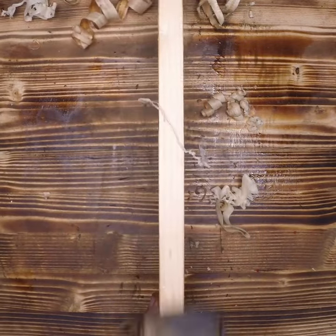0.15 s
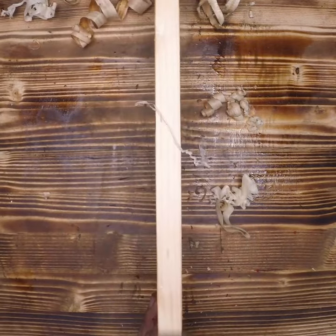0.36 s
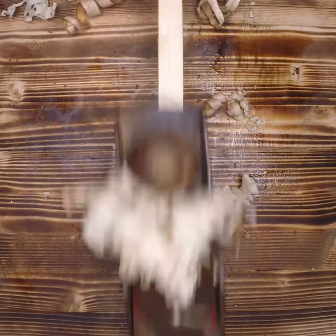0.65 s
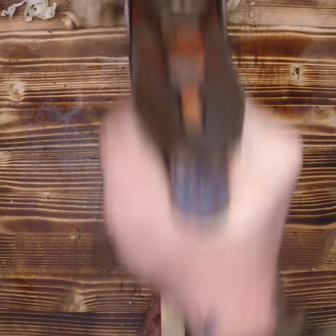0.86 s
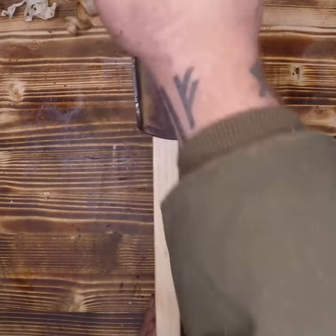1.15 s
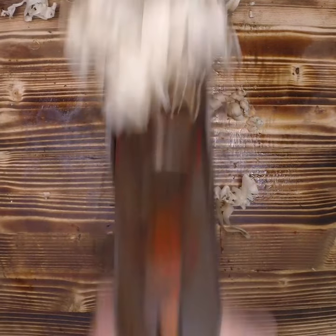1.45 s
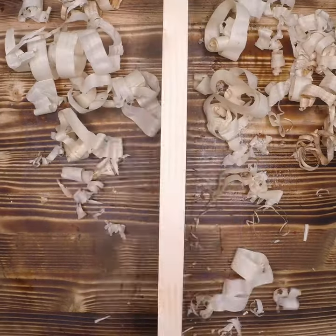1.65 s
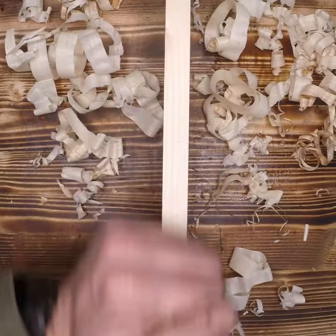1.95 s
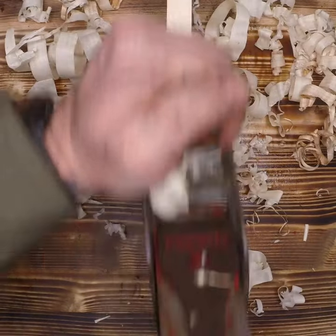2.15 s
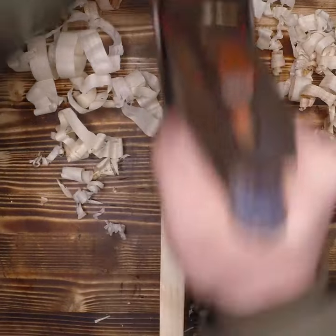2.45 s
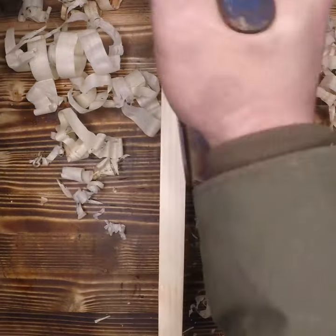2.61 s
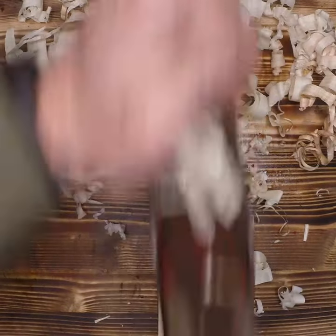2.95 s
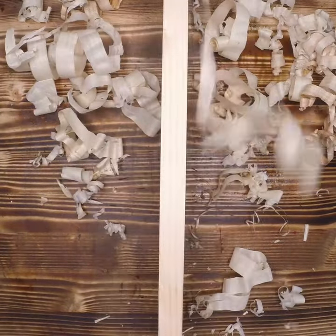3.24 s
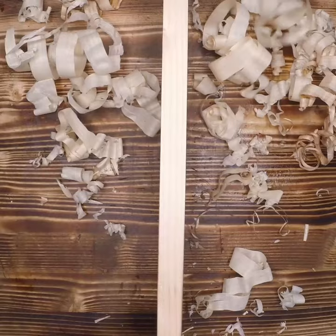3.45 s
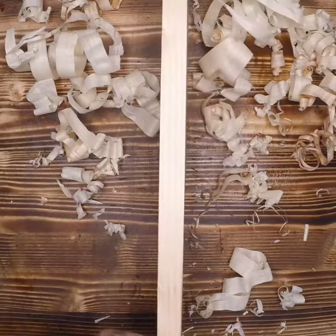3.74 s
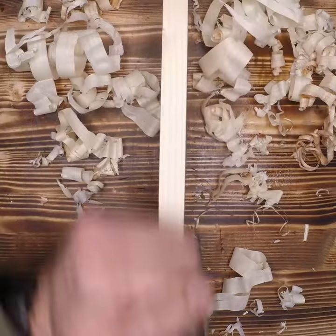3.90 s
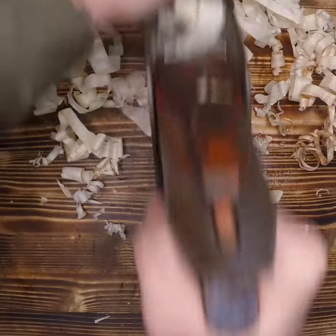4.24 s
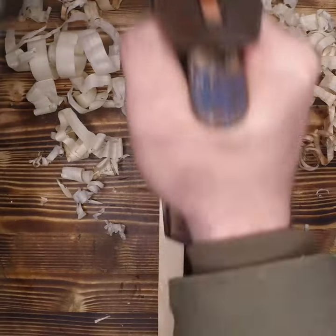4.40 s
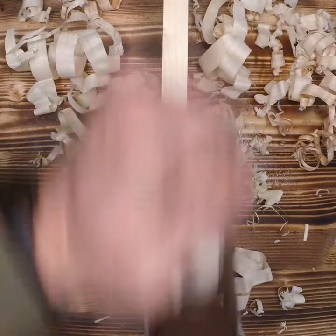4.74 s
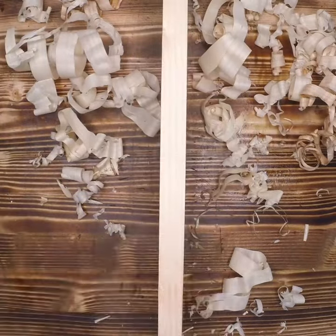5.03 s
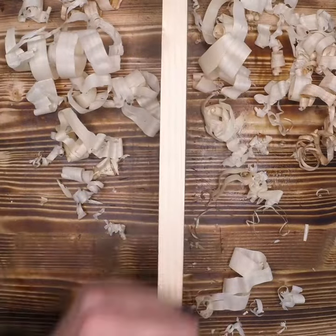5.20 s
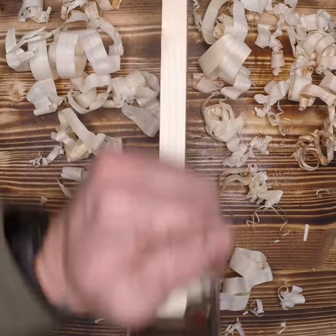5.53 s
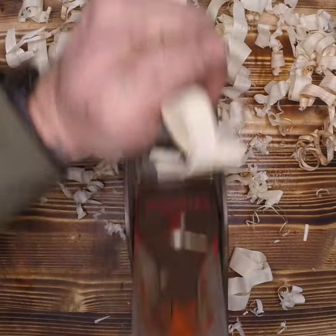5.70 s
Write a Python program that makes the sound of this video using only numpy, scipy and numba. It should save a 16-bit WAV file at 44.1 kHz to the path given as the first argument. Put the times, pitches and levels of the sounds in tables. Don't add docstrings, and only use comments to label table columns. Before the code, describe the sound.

A hand plane works a wooden board, heard close in a small workshop with a low, faint hum and short dull reverberation. Soft sliding and light bumps come first; from 0.5 s a rough, hollow rasp with tearing hiss brightens near 0.9 s, then drops into a grinding stutter with knocks at 1.1-1.2 s. A faint scrape and crisp curl snaps mark the return from 1.3 to 1.65 s. A sharp double knock lands at 1.77 s. The loudest stroke bites hard at 1.9 s and chatters on until 2.7 s. Rustling shavings and a quick drag back follow, crackling around 3.0 s and stopping with a clack at 3.25 s. After a lull, a hard double knock hits at 3.57 s. A short, bright stroke runs 3.93-4.3 s, then a quiet return ends in a knock at 4.98 s. Another landing clacks at 5.25 s, and a final rasp starts at 5.5 s, still going at the end.

```python
import sys
import numpy as np
from scipy import signal
from scipy.fft import rfft, irfft, next_fast_len
from scipy.io import wavfile
from scipy.ndimage import uniform_filter1d
from numba import njit

SR = 44100
rng = np.random.default_rng(int(sys.argv[2]) if len(sys.argv) > 2 else 0)


def bounce(signal):
    frames = np.transpose(np.atleast_2d(signal))
    limited = np.clip(frames, -1, 1)
    pcm = np.round(limited * 32767).astype(np.int16)
    wavfile.write(sys.argv[1], SR, pcm)


def makeup_ratio(level_db):
    decades = np.asarray(level_db, float) / 20
    return 10 ** decades


N = 258426

# pitch_hz, level_db, t60_s
BODY_MODES = [(315, -12.5, 0.13), (373, -31.5, 0.16), (522.4, 1, 0.1), (548, 1.5, 0.069), (608, -1, 0.14),
              (664.3, 7, 0.087), (735, 2.5, 0.15), (762.3, -1, 0.15), (850, 6, 0.086), (934, 3, 0.06),
              (1027, 3, 0.048), (1123, -3, 0.11), (1200, -1.5, 0.064), (1330, 7, 0.061), (1430, 2, 0.052),
              (1503.5, 2.5, 0.068), (1640, 2, 0.066), (1683, 2.5, 0.057), (1759, 4.5, 0.062),
              (1900, 7, 0.038), (2010, -27.5, 0.027), (2325, -0.5, 0.026), (2885, -0.5, 0.021),
              (2930, 0, 0.084)]
# start_s, peak_db, pitch_hz, t60_s
BENCH_THUMPS = [(0.06, -37, 138, 0.21), (0.09, -24.5, 149, 0.27), (0.244, -26, 85, 0.05),
                (.268, -34, 75, .08), (0.342, -25, 101, 0.14), (0.421, -27.5, 132, 0.065),
                (0.398, -22, 152, 0.036), (0.806, -20, 147, 0.23), (1.236, -31.5, 297, 0.28),
                (1.592, -25.5, 128, 0.061), (1.616, -24, 180, 0.029), (1.778, -17, 415, 0.17),
                (1.818, -23.5, 90, 0.083), (2.801, -34, 134, 0.19), (3.246, -18.5, 236, 0.17),
                (3.25, -15, 80.5, 0.15), (3.296, -25, 156.6, 0.17), (3.582, -15, 307.3, 0.21),
                (3.923, -25.5, 49.4, 0.078), (4.235, -33.5, 152.5, 0.3), (4.4, -28.5, 128, 0.049),
                (4.544, -33, 182, 0.12), (4.683, -28, 101, 0.099), (4.801, -36.5, 111, 0.22),
                (4.978, -13, 218, 0.11), (5.008, -20.5, 202, .05), (5.223, -34.5, 52, 0.36),
                (5.463, -33, 141.5, 0.17), (5.572, -26, 328, 0.19)]


def rms_one(x):
    return x / np.sqrt(np.mean(x ** 2) + 1e-20)


def evened(x, span_s):
    return x / np.sqrt(uniform_filter1d(x ** 2, size=int(span_s * SR)) + 1e-12)


def filtered(x, order, edge_hz, kind):
    return signal.sosfilt(signal.butter(order, edge_hz, kind, fs=SR, output="sos"), x)


def drift(rate_hz):
    r = np.exp(-2 * np.pi * rate_hz / SR)
    noise = rng.standard_normal(N + SR)
    return rms_one(signal.lfilter([1], [1, -2 * r, r * r], noise)[SR:])


def coloured(x, spectrum):
    hz, level_db = np.transpose(spectrum)
    size = next_fast_len(N)
    log_hz = np.log(np.arange(size // 2 + 1) * SR / size + 1e-3)
    gain = makeup_ratio(np.interp(log_hz, np.log(hz), level_db))
    return rms_one(irfft(rfft(x, size) * gain, size)[:N])


def grains(per_s, spread_db):
    sizes = makeup_ratio(spread_db * np.minimum(rng.exponential(1, N), 4))
    signs = rng.choice([-1, 1], N)
    return rms_one(sizes * signs * (rng.random(N) < per_s / SR))


def ring(x, hz, t60):
    r = makeup_ratio(-60 / (t60 * SR))
    w = 2 * np.pi * hz / SR
    return signal.lfilter([0, np.sin(w)], [1, -2 * r * np.cos(w), r * r], x + 1e-18)


@njit
def glide(x, w, r):
    y = np.zeros(len(x))
    for i in range(2, len(x)):
        drive = (1 - r[i] ** 2) / 2 * (x[i] - x[i - 2])
        y[i] = drive + 2 * r[i] * np.cos(w[i]) * y[i - 1] - r[i] ** 2 * y[i - 2]
    return y


def place(out, hit, i, peak_db):
    hit = makeup_ratio(peak_db) * hit / np.abs(hit).max()
    out[i:i + len(hit)] += hit[:N - i]


def controls(tables):
    t = np.arange(N) / SR
    out = np.zeros((len(tables[0][0]) - 1, N))
    for rows in tables:
        s, *columns = np.transpose(rows)
        i = round(s[0] * SR)
        out[:, i:] = [np.interp(t[i:], np.maximum.accumulate(s), c) for c in columns]
    return uniform_filter1d(out, size=160, axis=1)


def skid(s, hz, level_db, bite_db, fade_db_s):
    attack_s, rise_db, sag_octaves_per_s, slowest_hz = 0.012, 11.5, 10, 470
    t = np.concatenate([[0], attack_s + np.linspace(0, .4, 21)])
    after = np.maximum(t - attack_s, 0)
    ripple_hz = np.maximum(hz * 2 ** (-sag_octaves_per_s * after), slowest_hz)
    chatter_db = np.maximum(level_db - fade_db_s * after - rise_db * (t == 0), -77.5)
    bite = np.maximum(bite_db - 1.96 * fade_db_s * after, -102.5)
    return np.transpose([s + t, ripple_hz, chatter_db, bite])


def strokes():
    # start_s, ripple_hz, chatter_db, bite_db
    slide_in = [(0, 890, -51.5, -50), (.134, 1240, -48.5, -51.5), (.2, 1430, -42.5, -45.5),
                (.262, 1070, -41.5, -54.5), (.312, 610, -27, -58.5), (.39, 553, -51, -93),
                (.46, 604, -46.5, -57.5)]
    cut_1 = [(0.461, 594, -38.5, -64), (0.501, 1510, -38.5, -44.5), (.53, 1330, -25, -43.5),
             (0.6, 735, -21, -42.5), (0.655, 690, -26, -40), (0.699, 1330, -28.5, -42),
             (0.761, 1220, -29, -35), (.8, 770, -41, -38.5)]
    run_out_1 = [(.8, 775, -29.5, -39), (.845, 895, -49, -34), (.862, 1810, -32, -33.5),
                 (.935, 1890, -36, -36.5), (1.002, 1820, -29.5, -42), (1.045, 1200, -21, -38),
                 (1.097, 630, -25, -49.5), (1.128, 474, -23, -56.5), (1.205, 465, -27.5, -75),
                 (1.24, 490, -37.5, -88), (1.31, 470, -66, -101.5)]
    draw_back_1 = [(1.317, 777, -52.5, -70), (1.4, 2240, -73.5, -45), (1.524, 1880, -39.5, -43),
                   (1.548, 1920, -35.5, -50), (1.621, 727, -50, -49.5), (1.641, 770, -35.5, -51),
                   (1.658, 730, -75.5, -93.5)]
    cut_2 = [(1.886, 640, -30, -60), (1.894, 630, -16, -50), (1.916, 608, -24, -47.5),
             (1.926, 590, -9, -49), (2.049, 973, -21.5, -40), (2.128, 1380, -26, -45),
             (2.2, 850, -26, -41.5)]
    run_out_2 = [(2.2, 850, -27.5, -43.5), (2.29, 687, -15, -47), (2.42, 850, -23, -46),
                 (2.53, 900, -32, -39.5), (2.628, 948, -29, -43.5), (2.686, 827, -30, -52),
                 (2.72, 677, -36.5, -59.5), (2.752, 775, -51.5, -63)]
    draw_back_2 = [(2.759, 673, -67.5, -72.5), (3.0, 692, -40, -41.5), (3.08, 670, -37.5, -39.5),
                   (3.139, 2070, -38.5, -42), (3.202, 1550, -34.5, -47.5), (3.236, 1160, -22.5, -41),
                   (3.269, 1197, -16.5, -56.5)]
    landing_3 = [(3.917, 713, -38.5, -71.5), (3.927, 760, -19, -55), (3.941, 1230, -25, -28),
                 (3.958, 1270, -13, -35), (3.963, 1356, -23.5, -37.5)]
    cut_3 = [(3.969, 1440, -31.5, -36), (4.0, 1330, -37.5, -54), (4.026, 2010, -31, -32.5),
             (4.086, 1020, -22.5, -46.5), (4.133, 850, -23, -46), (4.203, 780, -29, -40.5),
             (4.244, 746, -43.5, -55), (4.34, 1505, -46.5, -58.5)]
    draw_back_3 = [(4.345, 1540, -59.5, -49.5), (4.386, 1970, -32, -44.5), (4.5, 743, -56.5, -63.5),
                   (4.762, 716, -52, -59), (4.779, 1920, -38.5, -54.5), (4.813, 1640, -45.5, -59),
                   (4.87, 1200, -46.5, -55), (4.955, 1530, -33.5, -50.5)]
    cut_4 = [(5.476, 412, -50.5, -83.5), (5.558, 645, -25.5, -62.5), (5.592, 876, -20.5, -46.5),
             (5.635, 1036, -25.5, -51), (5.682, 1154, -29.5, -48), (5.758, 917, -30, -42.5),
             (5.86, 947, -26.5, -50.5)]
    # start_s, ripple_hz, chatter_db, bite_db, fade_db_per_s
    skids = [
        (1.76, 724, -10, -35.5, 305),
        (3.272, 1250, -35, -51.5, 123),
        (3.498, 778, -51, -55, 286.5),
        (3.554, 598, -14.5, -37, 191.5),
        (4.971, 1246, -26.5, -45.5, 198),
        (5.16, 1900, -56, -75, 12.5),
        (5.246, 1390, -17.5, -33.5, 123.5),
    ]
    moves = [slide_in, cut_1, run_out_1, draw_back_1, cut_2, run_out_2, draw_back_2,
             landing_3, cut_3, draw_back_3, cut_4]
    moves += [skid(*row) for row in skids]
    return controls(sorted(moves, key=lambda rows: rows[0][0]))


def body(force, coupling_db):
    out = 0
    for k, (hz, level_db, t60) in enumerate(BODY_MODES):
        out = out + (-1) ** k * makeup_ratio(level_db) * ring(force * makeup_ratio(coupling_db[k]), hz, t60)
    return out


def chatter(level_db, hz, bite_db):
    bumps = grains(2500, spread_db=4.5) * makeup_ratio(1.9 * drift(57))
    w = 2 * np.pi * hz / SR
    r = np.exp(-np.pi * 0.42 * hz / SR)
    ripple = evened(glide(glide(bumps, w, r), w, r), 0.091)
    octave = evened(glide(glide(bumps, 2 * w, r), 2 * w, r), 0.32)
    rub = rms_one(filtered(grains(4000, spread_db=2.5), 2, [480, 2100], "band"))
    rub_db = 11 + 0.76 * (bite_db - level_db)
    force = ripple + makeup_ratio(-12) * octave + makeup_ratio(rub_db) * rub
    wander = [drift(7.9) for _ in range(6)]
    answer = body(force, [2.7 * wander[k % 6] for k in range(len(BODY_MODES))])
    direct = makeup_ratio(-12.5) * rms_one(force)
    return makeup_ratio(level_db) * evened(rms_one(answer) + direct, 0.028)


def blade(bite_db):
    # pitch_hz, level_db per Hz
    hiss_spectrum = [(1200, -1.5), (2000, 2.5), (2500, -5), (3200, -2), (4000, -8.5), (5000, -15.5),
                     (6300, -6), (9000, -67)]
    # pitch_hz, level_db per Hz
    shaving_spectrum = [(2500, -13.5), (5000, -8), (6300, -10), (8000, -13), (10000, -17.5), (13000, -28.5),
                        (15500, -28.5), (18000, -39)]
    # pitch_hz, width_hz, level_db
    iron_modes = [(2296, 96, 5), (2740, 62, 10), (2947, 17, 11), (3300, 280, 1.5), (3616, 62, 10),
                  (4470, 210, 5), (4620, 700, 4.5), (5710, 130, 1), (7190, 72, 20.5)]
    # start_s, end_s, extra_db
    loose_curls = [
        (1.317, 1.66, 10),
        (2.227, 2.724, 5),
        (2.856, 3.273, 8.5),
        (2.757, 2.77, 21),
        (2.873, 2.898, 4),
        (4.24, 4.275, 16),
        (4.336, 4.412, 7),
        (4.45, 4.515, 11),
        (4.773, 4.949, 7),
    ]
    tear = coloured(grains(8000, spread_db=-3.5), hiss_spectrum)
    iron = np.zeros(N)
    for hz, width, level_db in iron_modes:
        iron += makeup_ratio(level_db + 5.5 * drift(20)) * ring(tear, hz, 1.6 / width) * width / 900
    clumps = drift(4.4)
    hiss = rms_one(tear + makeup_ratio(-5.0) * iron) * makeup_ratio(bite_db + 0.32 * clumps)
    t = np.arange(N) / SR
    shavings_db = bite_db - 14
    for start, end, extra_db in loose_curls:
        shavings_db = shavings_db + extra_db * ((t > start) & (t < end))
    rustle = coloured(grains(13000, spread_db=3.5), shaving_spectrum)
    return hiss + rustle * makeup_ratio(shavings_db + 0.99 * clumps + 1.5 * drift(60))


def squeals(bite_db):
    out = np.zeros(N + SR)
    waver = drift(90)
    for when, pitch, span in rng.random((500, 3)):
        octaves = 2 * pitch ** 1.3
        t = np.arange(int(0.031 * (.5 + span) * SR)) / SR
        i, j = int(when * N), int(span * (N - SR))
        tone = np.sin(2 * np.pi * 2100 * 2 ** octaves * t)
        out[i:i + len(t)] += makeup_ratio(-5 * octaves) * np.hanning(len(t)) * waver[j:j + len(t)] * tone
    return out[:N] * makeup_ratio(bite_db - 4)


def catches():
    # start_s, peak_db, pitch_hz, length_s
    early = [(0.001, -37.5, 1950, 0.0073), (0.083, -37, 678, 0.024), (0.141, -35, 684, 0.021),
             (0.188, -30, 730, 0.0071), (.203, -32.5, 1450, 0.018), (0.213, -30, 700, 0.024),
             (.253, -27, 1120, 0.016), (0.256, -29, 517, 0.036), (2.219, -19, 1320, 0.014),
             (0.293, -24, 850, 0.017), (0.302, -24, 677, 0.02), (0.32, -31, 1082, 0.025),
             (0.714, -19, 1100, 0.015), (0.719, -30, 2830, 0.015), (0.733, -19.5, 1590, 0.0094),
             (0.856, -24.5, 1700, 0.014), (.893, -25.5, 1920, 0.031), (.9, -35, 2700, 0.038),
             (.95, -25.5, 1870, 0.008), (0.966, -24.5, 1625, 0.013), (.972, -28, 2010, 0.015),
             (0.991, -27, 1986, 0.021), (1.037, -22, 1313, 0.048), (1.082, -11, 758, 0.014),
             (1.112, -10, 540, 0.01), (1.955, -26, 1700, .03), (1.388, -39, 1940, 0.011),
             (1.415, -30.5, 1940, 0.021), (1.46, -33, 1980, 0.0088), (1.511, -30, 1550, 0.014),
             (1.55, -27, 780, 0.0067), (1.215, -24.5, 509, 0.025), (1.985, -5.5, 815, 0.0089),
             (2.003, -22.5, 1776, 0.038), (2.016, -15, 661, 0.014), (2.042, -27, 1957, 0.017),
             (2.552, -30, 1970, 0.045), (2.038, -15, 807, 0.0044), (2.236, -12, 850, 0.014),
             (2.27, -9.5, 861, 0.013), (2.286, -15, 695, 0.0058), (2.426, -13, 840, 0.0092),
             (2.468, -20, 850, 0.0079), (2.446, -23.5, 1290, 0.031), (2.612, -21, 910, 0.017),
             (2.623, -22, 950, 0.027), (2.071, -20, 1007, 0.034), (2.807, -28.5, 830, 0.0036)]
    # start_s, peak_db, pitch_hz, length_s
    late = [(3.151, -31, 2020, 0.025), (3.172, -31, 1930, 0.028), (3.195, -23, 1593, 0.021),
            (3.211, -21, 1258, .015), (3.229, -15, 1442, 0.011), (3.941, -26, 2540, 0.019),
            (3.268, -22, 1172, 0.04), (3.567, -25, 1480, 0.016), (3.575, -22, 1705, 0.013),
            (3.577, -22, 1340, 0.014), (3.558, -15, 687, 0.0072), (0.542, -21.5, 1042, 0.022),
            (.55, -23, 1514, 0.023), (0.635, -13, 687, 0.017), (1.766, -7, 640, 0.008),
            (2.407, -16, 853, 0.012), (3.599, -20, 553.6, 0.036), (3.927, -23, 777, 0.014),
            (3.929, -13, 1283, 0.02), (5.25, -27, 1674, 0.022), (3.934, -19, 684, 0.013),
            (3.952, -21, 1310, 0.0095), (4.025, -18, 1843, 0.015), (4.048, -23, 1780, 0.014),
            (4.076, -20, 1233, 0.017), (4.077, -29.5, 2490, .015), (4.094, -17.5, 999, 0.017),
            (4.141, -18.5, 680, 0.012), (5.247, -9.5, 1335, 0.011), (3.924, -21, 1704, 0.036),
            (4.96, -22, 1388, 0.017), (5.277, -14, 1428, 0.011), (5.278, -27, 2650, 0.014),
            (5.31, -17, 721, 0.0086), (5.507, -35, 697, 0.021), (5.597, -18, 902, 0.017),
            (5.66, -23, 1119, 0.03), (5.789, -21.5, 885, 0.03)]
    out = np.zeros(N)
    t = np.arange(int(.15 * SR)) / SR
    for s, peak_db, hz, length_s in early + late:
        swell = np.sin(np.pi * np.clip(t / max(length_s, .003), 0, 1))
        hit = np.zeros(len(t))
        for f, level_db in [(hz, 0), (1.2 * hz, -12)]:
            drive = swell * np.sin(2 * np.pi * f * t)
            hit += makeup_ratio(level_db) * ring(drive, f, 16.7 / f)
        place(out, hit, max(round(s * SR), 0), peak_db)
    return out


def shudder():
    t = np.arange(N) / SR
    gain = np.zeros(N)
    for s, peak_db, *_ in BENCH_THUMPS:
        decay_db = -60 * np.maximum(t - s, 0) / 0.39
        gain += makeup_ratio(min(peak_db, -21.0) - 18 + decay_db) * np.clip((t - s) * 200, 0, 1)
    return gain


def rumble(chatter_db):
    # pitch_hz, level_db per Hz
    rumble_spectrum = [(41, -33), (70, -4.5), (100, -3), (146, 7), (254, 5.5), (307, 7), (343, 3.5),
                       (420, 4), (550, 6), (900, -69.5)]
    # start_s, level_db
    weight = [(0, 12), (.35, 9.5), (.55, -5.5), (.78, 10.5), (.85, 13), (1.05, 0.5), (1.22, 16.5),
              (1.45, 6), (1.85, 13), (2.2, 1), (2.45, 11.5), (2.6, -8), (2.72, 18.5), (3.35, 2), (3.87, 17),
              (3.93, 5.5), (4.2, 0.5), (4.9, 8), (5.07, 0), (5.27, 4), (5.5, 15), (5.86, -3.5)]
    level_db = -41 + 0.36 * chatter_db + controls([weight])[0]
    noise = coloured(rng.standard_normal(N), rumble_spectrum)
    return noise * (makeup_ratio(level_db) + shudder()) * makeup_ratio(2.9 * drift(11.0))


def shop():
    # pitch_hz, level_db per Hz
    shop_spectrum = [(60, -42.5), (100, -37), (140, -5.5), (370, -33), (600, -4.5), (800, -8), (1250, -15),
                     (2000, -23), (3200, -34), (6000, -42.5), (15000, -60.5)]
    return coloured(rng.standard_normal(N), shop_spectrum) * makeup_ratio(-50.5 + 2.3 * drift(4))


def sway():
    # start_s, level_db
    sway_levels = [(0.0, -36), (0.31, -39), (0.93, -52), (1.68, -42), (2.37, -52.5), (3.49, -40),
                   (4.29, -49), (4.9, -41.5), (5.45, -57), (5.86, -53)]
    s, level_db = np.transpose(sway_levels)
    deep = [(10, -55), (25, -9.5), (42, -1.5), (70, -12.0), (110, -9.0), (300, -73.5)]   # pitch_hz, level_db
    low = coloured(rng.standard_normal(N), deep)
    return low * makeup_ratio(np.interp(np.arange(N) / SR, s, level_db))


def thumps():
    out = np.zeros(N)
    push = np.concatenate([np.hanning(130), np.zeros(SR // 2)])
    for s, peak_db, hz, t60 in BENCH_THUMPS:
        hit = ring(push, hz, t60) + 0.94 * ring(push, 1.7 * hz, 0.41 * t60)
        hit = filtered(hit, 2, 0.6 * hz, "high")
        place(out, hit, round(s * SR), peak_db)
    return out


def snaps():
    # start_s, peak_db, pitch_hz, ring_cycles
    breaks = [(0.0768, -23, 3010, 60), (0.135, -23, 2710, 10), (1.322, -20, 1950, 2.7),
              (1.3607, -26, 2170, 37), (1.4, -24, 2030, 29), (1.491, -24, 5200, 2.8),
              (1.526, -33, 3600, 4.4), (1.5386, -12.5, 3130, 17), (2.9842, -13, 2800, 4.7),
              (3.007, -12, 3300, 2.9), (3.026, -21, 3500, 4), (3.047, -21, 3600, 4.1),
              (3.114, -18, 1990, 17), (3.261, -21.5, 3500, 3), (3.3477, -30.5, 2330, 4.2),
              (3.504, -48, 3200, 8.1), (4.013, -16, 2170, 11), (4.375, -25, 2960, 25),
              (4.8672, -29.5, 2920, 66)]
    out = np.zeros(N)
    t = np.arange(2000) / SR
    for s, peak_db, hz, cycles in breaks:
        fizz = rng.standard_normal(len(t)) * makeup_ratio(-60 * t / 0.03)
        hit = np.diff(ring(fizz, hz, cycles / hz), prepend=0)
        hit = filtered(hit, 1, 8000.0, "low")
        place(out, hit, round(s * SR), peak_db - 11.5)
    return out


def knocks():
    # start_s, peak_db, centre_hz, rattle_t60_s
    blows = [(0.322, -17.5, 514, 0.12), (0.396, -22.5, 710, 0.024), (0.707, -7.5, 1330, 0.079),
             (1.106, -4, 560, 0.055), (1.187, -10, 548, 0.03), (1.767, -6, 704, 0.021),
             (1.926, 0.5, 650, 0.026), (2.336, -4, 700, 0.036), (2.406, -7.5, 900, 0.12),
             (2.8, -23, 764, 0.087), (3.23, -8.5, 1420, 0.042), (3.249, -6.5, 526, 0.012),
             (3.559, -9, 608, 0.14), (3.585, -0.5, 638, 0.036), (3.953, -8, 1250, 0.015),
             (4.041, -5.5, 1830, 0.006), (4.978, -7.5, 1284, 0.044), (5.254, -5, 773, 0.068)]
    # start_s, peak_db, centre_hz, rattle_t60_s
    more_blows = [
        (1.7836, -3, 1330, 0.033),
        (4.389, -26, 1900, 0.055),
        (5.253, -15, 1350, 0.04),
        (5.278, -16, 1350, 0.035),
        (1.539, -15, 1740, .04),
        (5.121, -29.5, 760, 0.026),
    ]
    out = np.zeros(N)
    t = np.arange(int(.3 * SR)) / SR
    for s, peak_db, hz, t60 in blows + more_blows:
        contact = rng.standard_normal(len(t)) * makeup_ratio(-60 * t / t60) + 40 * (t == 0)
        force = ring(ring(contact, hz, 8 / hz), hz, 8 / hz)
        answer = body(force, rng.normal(0, 3, len(BODY_MODES)))
        hit = rms_one(answer) + makeup_ratio(6) * rms_one(force)
        hit = filtered(hit, 4, 0.66 * min(hz, 800.0), "high")
        place(out, hit, round(s * SR) - 60, peak_db - 4.0)
    return out


def workshop(x):
    t60_s, wall_cut_hz = 0.38, 2970
    t = np.arange(SR // 2) / SR
    tail = rng.standard_normal(len(t)) * makeup_ratio(-60 * t / t60_s) * (t > .006)
    dull = filtered(tail, 2, wall_cut_hz, "low")
    return signal.fftconvolve(x, dull / np.sqrt(np.sum(dull ** 2)))[:N]


def scene():
    hz, chatter_db, bite_db = strokes()
    plane = chatter(chatter_db, hz, bite_db) + blade(bite_db) + catches() + snaps() + knocks()
    bench = rumble(chatter_db) + thumps()
    room = makeup_ratio(-17) * workshop(plane)
    return (plane + room + bench + shop() + sway() + squeals(bite_db))[None]


def starve(x):
    # start_s, thinned_above_hz, empty_above_hz
    thinned = [(.3, 1800, 4200), (.6483, 3600, 12000), (.6657, 3600, 7200), (.724, 3000, 10500),
               (.767, 3000, 9000), (.815, 3000, 9000), (1.044, 3200, 7700), (1.087, 3200, 7700),
               (1.133, 2950, 4700), (1.46, 3500, 15000), (1.474, 575, 11600), (2.011, 2800, 5000),
               (2.18, 3500, 3900), (2.281, 1800, 5900), (2.4813, 3700, 4200), (2.4987, 3700, 4200),
               (2.5813, 2300, 7600), (2.5987, 1000, 7600), (2.716, 2500, 5100), (2.75, 2500, 8500),
               (2.9513, 2500, 7600), (2.9687, 4800, 9000), (3.0573, 2500, 7300), (3.0747, 4500, 7300),
               (3.158, 5000, 13500), (3.865, 2400, 4000), (4.157, 3200, 6200), (4.545, 3000, 7500),
               (4.607, 3500, 14000), (4.6244, 1000, 13500), (4.6418, 3500, 7500), (5.658, 3700, 4800)]
    # start_s, empty_below_hz
    bass_losses = [
        (.775, 400),
        (2.586, 430),
        (2.599, 430),
        (4.158, 380),
    ]
    size = 1536
    out = x.copy()
    fade = np.hanning(size) ** .5
    hz = np.arange(size // 2 + 1) * SR / size
    losses = [(s, 0, thin, top) for s, thin, top in thinned]
    losses += [(s, edge, SR, SR) for s, edge in bass_losses]
    for s, lost_below, thin_above, lost_above in losses:
        i = round(s * SR) - size // 2
        lines = rfft(x[i:i + size] * fade)
        power = np.abs(lines) ** 2
        weak = power < 1.4 ** 2 * uniform_filter1d(power, size=30)
        empty = (hz > lost_above) | (hz < lost_below)
        lost = np.maximum(.85 * (weak & (hz > thin_above)), empty)
        out[i:i + size] -= irfft(lines * lost) * fade
    return out


def low_pass(x):
    return signal.sosfilt(signal.butter(12, 15300, fs=SR, output="sos"), x)


def record(dry):
    rounded = 1.15 * np.tanh(dry[0] / 1.15)
    cut = signal.cheby2(12, 60, 15800, fs=SR, output="sos")
    mix = starve(signal.sosfilt(cut, rounded))[None]
    return low_pass(mix)


dry = scene()
out = record(dry)
bounce(out)
```